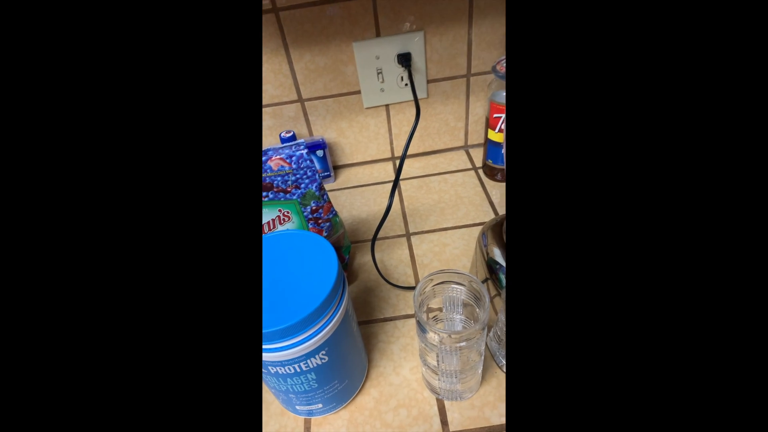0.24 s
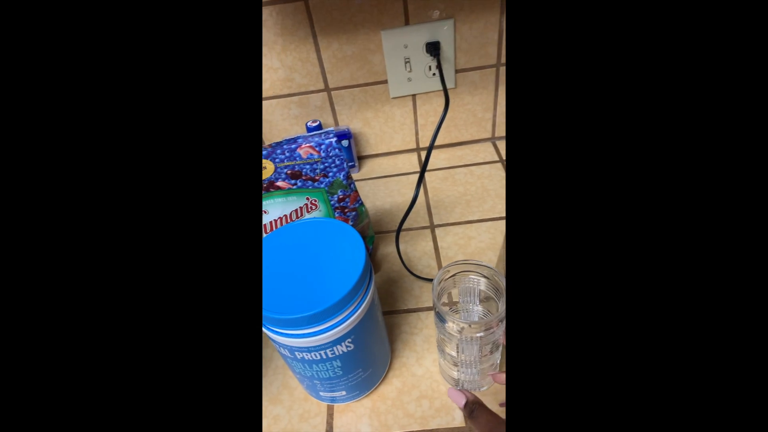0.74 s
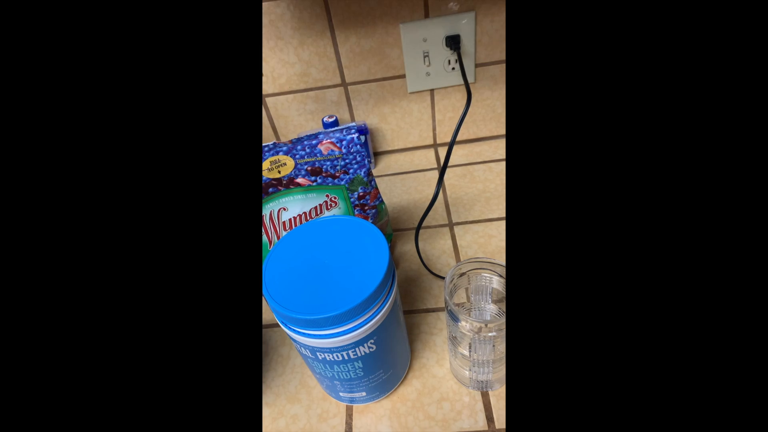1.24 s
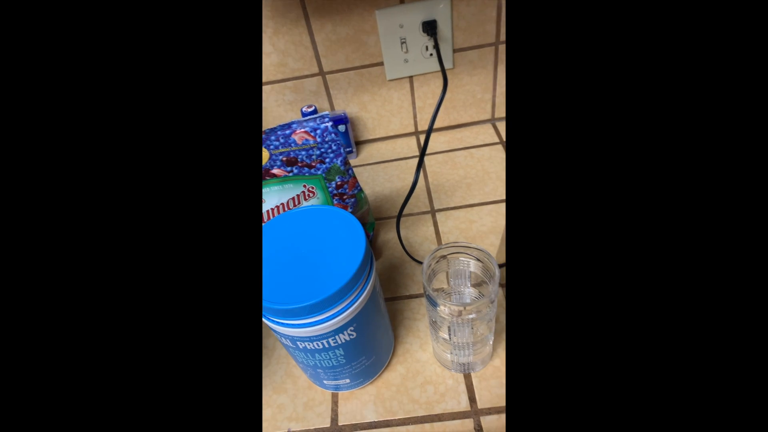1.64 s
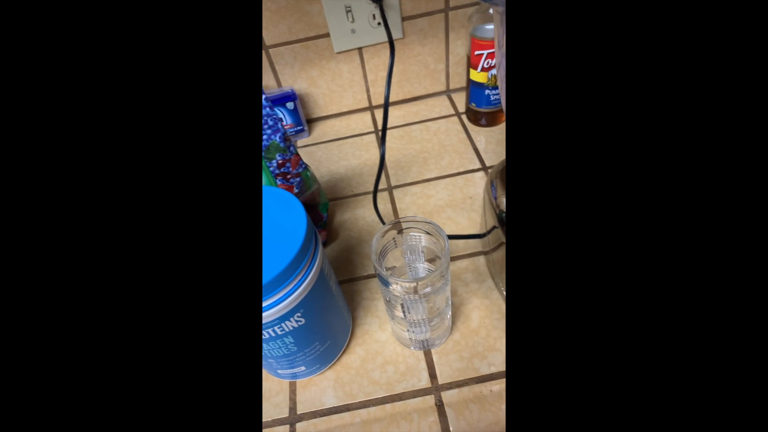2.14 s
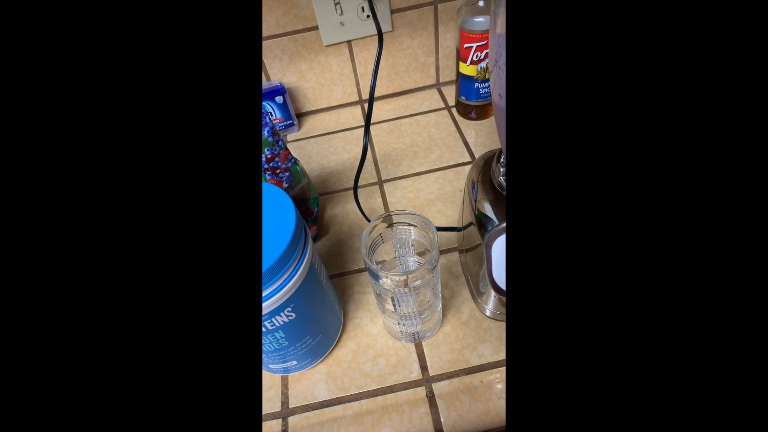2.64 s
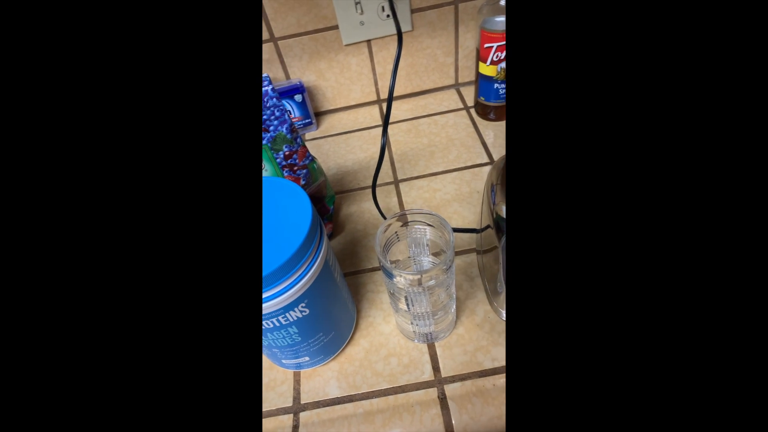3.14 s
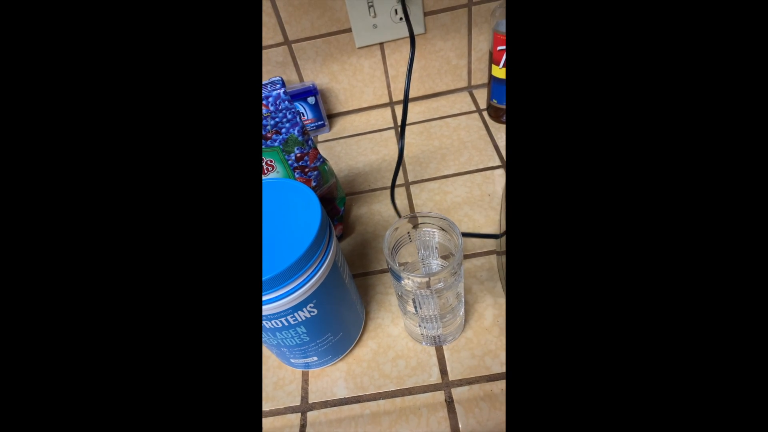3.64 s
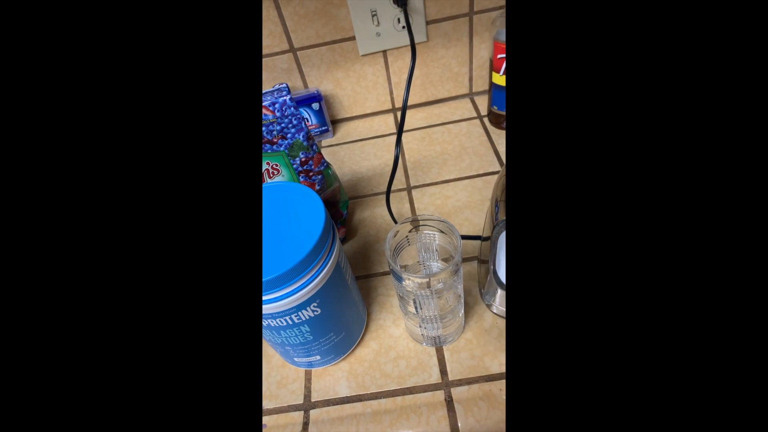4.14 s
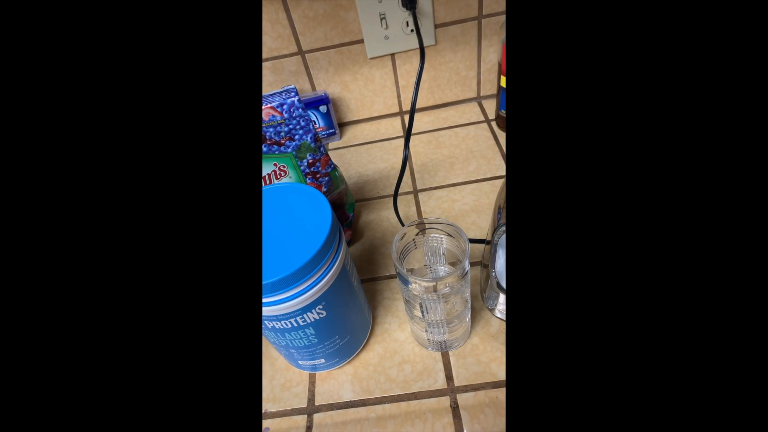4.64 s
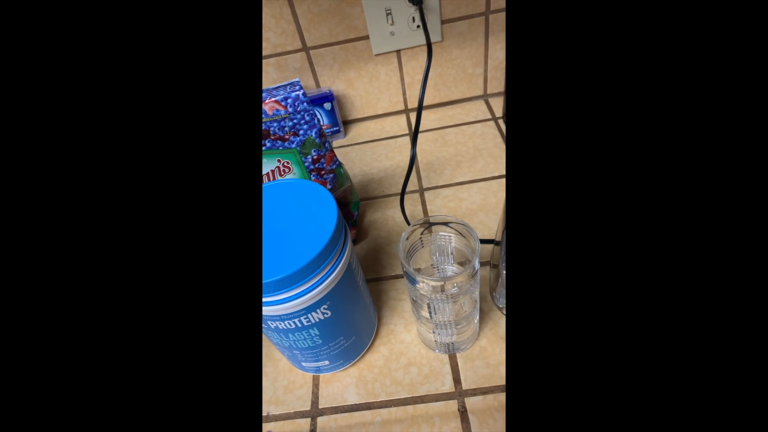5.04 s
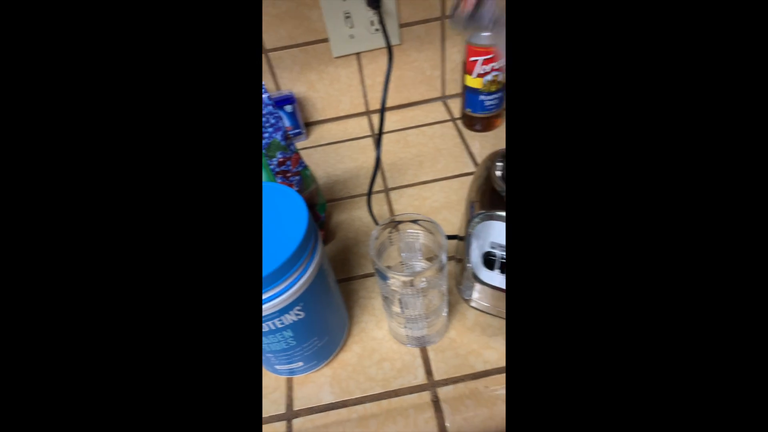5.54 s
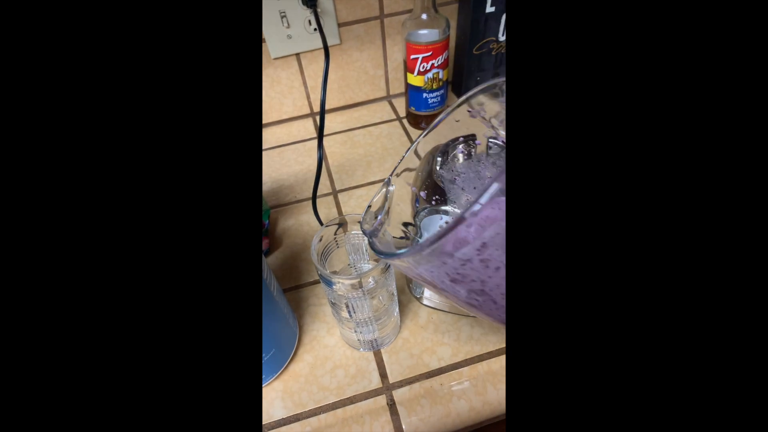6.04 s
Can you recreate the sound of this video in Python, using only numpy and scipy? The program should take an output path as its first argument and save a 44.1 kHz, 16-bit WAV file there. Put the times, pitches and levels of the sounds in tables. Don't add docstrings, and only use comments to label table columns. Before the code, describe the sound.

In a small, hard tiled kitchen, a drinking glass is dragged in a loud stuttering scrape, its rim clinking. A small hard object taps down, the glass slides briefly again, then a blender jug is twisted and rocked off its motor base with hollow knocks, sharp snaps and low thumps. Close handheld phone pickup, quiet room tone and faint low handling rumble.

```python
import sys
import numpy as np
from scipy import signal
from scipy.fft import rfft, irfft, next_fast_len
from scipy.io import wavfile
from scipy.ndimage import uniform_filter1d

SR = 44100
rng = np.random.default_rng(int(sys.argv[2]) if len(sys.argv) > 2 else 0)


def output_pcm(signal):
    pcm = np.clip(np.atleast_2d(signal).T, -1, 1) * 32767
    wavfile.write(sys.argv[1], SR, np.round(pcm).astype(np.int16))


def gain_from_decibels(decibels):
    exponent = np.asarray(decibels, float) / 20
    return 10 ** exponent


N = 277389

# frequency in Hz, level in dB.
HUSH_SPECTRUM = [(30, -7), (70, -2), (140, -6), (300, -6), (400, -9), (520, -21), (750, -15), (1100, -30),
                 (2000, -30), (2800, -35), (3600, -40), (5000, -44), (8000, -45), (16000, -49)]
# frequency in Hz, correlation from 0 to 1.
HUSH_LIKENESS = [(60, 1), (200, .9), (600, .8), (2000, .8), (3500, .65), (5000, .95), (8000, .6),
                 (12000, .9)]
# frequency in Hz, lead in rad.
HUSH_LEAD_RAD = [(0, 0), (600, 2.7), (1120, 3.5), (5170, 3.0), (6460, 5.2), (8870, 6.6), (11500, 9.2),
                 (13000, 9.8), (15700, 12.7), (16400, 19.4)]
# frequency in Hz, lead in rad.
GLASS_LEAD_RAD = [(0, 0), (780, -2.9), (1120, -0.8), (1810, 0.1), (2670, -2.8), (4220, -4.5), (6200, -1.0),
                  (9040, 0.2), (10900, 2.6), (13000, 3.4), (15100, 6.2), (16400, 6.6)]
# frequency in Hz, lead in rad.
JUG_LEAD_RAD = [(0, 0), (860, -3.4), (1810, -6.2), (2580, -9.2), (3960, -10.8), (5860, -8.7), (6630, -7.0),
                (8790, -6.1), (11300, -3.5), (12900, -2.9), (15200, -0.2), (16400, 0.2)]
# frequency in Hz, t60 in seconds.
ROOM_T60_S = [(100, 1), (300, 0.18), (800, 0.41), (2000, 0.28), (5000, 0.36), (12000, 0.311)]
# frequency in Hz, factor.
ECHO_APART_FACTOR = [(100, .15), (400, .6), (1200, 1.6), (2500, 1.5), (5000, .6), (9000, .25)]
# time in seconds, level in dB.
SQUEEZES = [(.16, -61.5), (.4, -65), (0.821, -68), (1.021, -72), (1.44, -68), (1.979, -63), (2.6, -66.5),
            (2.999, -62.5), (3.599, -62.5), (4.45, -71), (4.85, -70), (6.0, -71.5), (6.27, -63.5)]

# time in seconds, peak in dB.
TAPS = [
    (1.3905, -48.5),
    (1.3985, -40),
    (1.4025, -43.5),
    (1.4078, -51.5),
    (1.4175, -39),
    (1.4215, -46.5),
    (1.4275, -56),
]
# frequency in Hz, level in dB, t60 in seconds.
THING_MODES = [(1104, -3, 0.1), (1700, 0, 0.03), (1913, -9.5, 0.035), (2821, -3, 0.12), (3801, -8, 0.08),
               (4737, -7, 0.16), (5400, -11, 0.12), (6218, 0, 0.07), (6347, -4, 0.1), (8710, -6, 0.13),
               (10300, -14, 0.12)]

# start in seconds, hardest point in seconds, end in seconds,
# chatter in dB, low scrape in dB.
DRAGS = [(-0.05, 0.01, 0.085, -46, -58.5), (0.072, 0.082, 0.099, -38.5, -38), (0.1, 0.14, 0.32, -29, -52),
         (0.29, 0.312, 0.43, -32, -55.5), (0.42, 0.475, 0.51, -57, -42.5), (0.76, 0.83, 0.88, -59.5, -44),
         (0.875, 0.895, 0.922, -57, -48.5), (0.62, 0.72, 0.75, -66, -61), (0.93, 1.05, 1.145, -72, -71.5),
         (1.18, 1.3, 1.6, -70, -71), (1.78, 1.806, 1.98, -42.5, -49), (1.86, 1.946, 2.155, -44.5, -55)]
# peak in seconds, peak in
# dB, foot ring in Hz, wall ring relative to it in dB.
CATCHES = [(0.0818, -45, 1200, -10), (0.1156, -32, 1310, -13.5), (0.1199, -13, 1300, -3.5),
           (0.1286, -29.5, 1240, -10.5), (0.1362, -30.5, 1240, -1), (0.1406, -29, 1450, -5),
           (0.1526, -16, 1190, -7.5), (0.1612, -34.5, 1180, -10.5), (0.168, -32.5, 1240, -14.5),
           (0.175, -14.5, 1180, -5), (0.1838, -22.5, 1230, -18.5), (0.1911, -31.5, 1280, -6.5),
           (0.2002, -28, 1250, -3.5), (0.2072, -34.5, 1300, -11.5), (0.2136, -27, 1280, -17),
           (0.2237, -27.5, 1240, -16.5), (0.228, -21, 1220, -8), (0.2352, -28.5, 1200, -15),
           (0.2432, -31.5, 1270, -10), (0.2487, -25, 1450, -8.5), (0.2665, -40, 1310, -13),
           (0.2768, -37, 1290, -10), (0.285, -38.5, 1310, -9), (0.3024, -31.5, 1320, -11),
           (0.3071, -22.5, 1220, -2.5), (0.3198, -19, 1360, -6.5), (0.3273, -26.5, 1270, -9),
           (0.3314, -21.5, 1310, -14), (0.3404, -35.5, 1290, -5.5), (0.3501, -32, 1210, -14),
           (0.3597, -36, 1270, -14), (0.3651, -24, 1390, -11.5), (0.3778, -32, 1290, -23.5),
           (0.3853, -40, 1420, -11), (0.4046, -39, 1430, -6), (0.4156, -40.5, 1300, -5),
           (0.4327, -43.5, 1060, 0), (0.4385, -32.5, 1180, -7), (0.447, -37.5, 1160, -15),
           (0.4778, -34, 1260, -8.5),
           (1.788, -47.5, 1380, 8), (1.8005, -45.5, 1300, 8), (1.8066, -30.5, 1230, -8.5),
                  (1.8165, -35, 1225, -15.5), (1.8231, -32, 1240, -13), (1.8365, -35.5, 1226, -12),
                  (1.8735, -37, 1260, -15), (1.8825, -42.5, 1140, -10), (1.8957, -42, 1240, -22),
                  (1.9022, -24.5, 1172, -6.5), (1.9122, -39, 1170, -3), (1.9193, -26, 1180, -6),
                  (1.9234, -25, 1300, -15), (1.9299, -25.5, 1315, -18), (1.9362, -36, 1260, -5.5),
                  (1.9417, -29.5, 1300, -16.5), (1.9476, -20, 1390, -14), (1.9547, -33.5, 1177, -13),
                  (1.9607, -24.5, 1260, -4), (1.9683, -30, 1204, 4), (1.972, -35.5, 1250, -19),
                  (1.9753, -40.5, 1280, -7.5), (1.985, -43, 1300, -6), (1.9907, -37.5, 1415, -8),
                  (2.0013, -44.5, 1330, -10)]
# time in seconds, level in dB.
EDGE_TICKS = [(0.0783, -61), (0.1182, -38), (0.1501, -50.5), (0.1726, -49), (0.2262, -55), (0.2304, -51.5),
              (0.3063, -44.5), (0.318, -57), (0.3636, -65.5), (1.7878, -55.5), (1.8312, -56),
              (1.8696, -67.5), (1.902, -57.5), (1.9265, -55.5), (1.9579, -58)]
# time in seconds, ring in dB, clack in dB.
CLINKS = [(0.4185, -77, -74), (0.4294, -61, -54), (0.4339, -35.5, -46), (0.4605, -43.5, -51),
          (0.4665, -43, -52), (0.5024, -58, -50), (0.517, -54, -57), (0.5516, -68, -57), (0.8885, -91, -70),
          (0.9348, -85, -70), (0.9647, -69, -64)]
# start in seconds, hardest point in seconds, end in seconds,
# level in dB.
SHIVERS = [
    (0.6, 0.62, 1.02, -94),
    (0.79, 0.82, 0.85, -67),
    (0.93, 0.97, 0.95, -70),
    (1.19, 1.3, 1.32, -74.5),
]
# frequency in Hz, width in Hz, level in dB.
HOLLOW_MODES = [(225, 90, -23.5), (700, 150, -31), (880, 150, -14.5), (1180, 150, -8), (1300, 210, -1.5),
                (1420, 150, -7.5), (1710, 110, -9), (2235, 680, 1), (2377, 220, -13.5), (2650, 300, -16.5),
                (3240, 160, -17.5), (4020, 250, -13.5)]
# frequency in Hz, width in Hz, level in dB.
TILE_MODES = [(191, 82, -3.5), (272, 57, -8), (396.6, 25, -4.5), (586, 36, -9.5), (890, 44, -10)]
# frequency in Hz, level in dB, t60 in seconds.
RIM_MODES = [(4140, -24, .15), (5938, -5, .08), (6293, -8, .3), (6557, 0, .09), (7730, -24, .2),
             (9566, -8, .3), (9660, -15, .8), (10060, -12, .35), (11400, -20, .14), (13830, -16, .2),
             (13990, -13, .15), (15680, -13, .22)]
# frequency in Hz, level in dB.
CLACK_SPECTRUM = [(2500, -59), (4000, -4), (6500, -3.5), (9000, -9), (12000, 2.5), (14500, -4.5),
                  (16000, -12), (17500, -20)]
# frequency in Hz, level in dB.
CRACK_SPECTRUM = [(1500, -29), (3000, -9.5), (5000, -4.5), (6500, -4.5), (9000, -8.5), (12000, -8.5),
                  (14500, -12.5), (16500, -28.5)]

# start in seconds, hardest point in seconds, end in seconds, pressure in dB.
RUBS = [(1.625, 1.645, 2.9, -71.5), (2.47, 2.495, 2.56, -69.5), (2.53, 2.64, 2.84, -77.5),
        (2.87, 2.93, 2.98, -50.5), (2.9, 3.09, 3.21, -56), (3.29, 3.38, 4.7, -62.5),
        (3.45, 3.62, 3.05, -66), (3.92, 4.06, 4.6, -56), (4.13, 4.19, 4.3, -43.5), (4.54, 4.6, 4.96, -54.5),
        (4.62, 4.68, 4.52, -48), (4.8, 4.94, 3.7, -77), (4.99, 5.05, 4.96, -59), (4.3, 4.4, 4.52, -65),
        (4.7, 4.76, 3.33, -63.5), (5.08, 5.12, 5.3, -68.5), (3.12, 3.23, 3.34, -67.5)]
# time in seconds, strength in dB, hardness in dB.
TWISTS = [(1.6309, -71, -29), (2.4865, -60, -13), (2.873, -55, -1.5), (2.8996, -41.5, -13.5),
          (2.972, -46.5, -1.5), (3.0044, -35.5, 1.5), (3.095, -53.5, -1), (3.1035, -37, -14),
          (3.2032, -55, -4), (3.228, -50, -15), (3.301, -57.5, 0.5), (3.3117, -54.5, -1),
          (3.3366, -44.5, -12.5), (3.4, -48.5, -4.5), (3.4061, -51.5, 0.5), (3.419, -51, 3.5),
          (3.4413, -26.5, -4.5), (3.447, -34.5, -5.5), (3.6185, -55.5, -2), (3.6376, -51, -22),
          (3.658, -61.5, -0.5), (3.701, -67.5, -2.5)]
# time in seconds, strength in dB, hardness in dB.
LIFTS = [(3.8126, -47, -3), (3.8214, -34, -5), (3.8253, -23, 5.5), (3.8304, -26.5, -3.5),
         (3.8411, -37, -15), (3.945, -35, 6.5), (3.9554, -30, 4), (3.9776, -31.5, 4), (3.9834, -29.5, -6),
         (4.031, -32.5, -2), (4.0552, -36.5, 1), (4.141, -37, -12), (4.1523, -39.5, -23),
         (4.168, -41.5, -26), (4.185, -42, 8), (4.2067, -36.5, -26), (4.247, -37.5, -30),
         (4.2716, -43.5, -14), (4.286, -38, 1.5), (4.407, -59, -27), (4.544, -46.5, -3.5),
         (4.642, -42, 0.5), (4.6484, -44.5, -20), (4.576, -66, -11), (4.606, -64, -15), (4.6847, -59, 3),
         (4.699, -53.5, -10), (4.74, -65, 3), (4.873, -69, -13), (4.931, -71, -27.5), (4.995, -56.5, -11),
         (5.0188, -44.5, -18), (5.034, -51.5, -6), (5.052, -52, -11.5), (5.099, -67, -9)]
# time in seconds, level in dB.
SNAPS = [(3.0045, -27), (3.4411, -5.5), (3.8256, -16), (3.9553, -27), (3.9793, -34), (4.0311, -23),
         (4.0561, -31), (4.1394, -32.5), (4.1545, -36), (4.168, -40), (4.1868, -33), (4.2465, -45),
         (4.2716, -46.5), (4.2881, -29.5), (4.652, -30.5), (5.0195, -53), (5.0995, -52)]
# time in seconds, counter thump in dB, housing boom in dB.
THUMPS = [(1.6314, -68, -49.5), (2.4858, -53, -51.5), (2.9003, -46, -54), (3.0049, -41, -37.5),
          (3.1069, -44.5, -51), (3.2014, -58, -47.5), (3.441, -40, -52), (3.6147, -60, -57),
          (3.8201, -39.5, -31), (3.9448, -45, -32), (3.984, -47, -53), (4.0327, -53, -34),
          (4.0928, -50, -43), (4.1876, -42.5, -41), (4.2084, -54, -58.5), (4.2719, -53.5, -46),
          (4.4059, -69, -54), (4.5466, -70.5, -45), (4.6449, -47.5, -36), (4.6849, -46, -46),
          (4.951, -70, -51), (4.83, -65, -53), (5.0544, -56.5, -43), (5.1008, -66, -62.5)]
# time in seconds, peak in dB.
RATTLES = [
    (4.058, -44),
    (4.085, -68),
    (4.8598, -80),
    (4.9516, -92),
    (5.1, -67),
]
# frequency in Hz, width in Hz, level in dB.
SHELL_MODES = [(565, 62, -10), (931, 130, -5.5), (1240, 503, 8.5), (1390, 142, 0), (1723, 150, -3),
               (1900, 180, -12.5), (2481.7, 257, -1), (2845, 430, -9), (3460, 340, -5.5), (4100, 380, -12),
               (5025, 180, -10)]
# frequency in Hz, width in Hz, level in dB.
HOUSING_MODES = [(129, 68, -2), (185, 98, 1.5), (272, 74, -0.5), (397, 28, -0.5), (557, 40, -14.5),
                 (693, 77, 0.5)]
# frequency in Hz, width in Hz, level in dB.
COUNTER_MODES = [(61, 8.1, 6.5), (73.6, 53, 9.5), (126.8, 23, -0.5)]
# frequency in Hz, level in dB, t60 in seconds.
BLADE_MODES = [(4792, -21.5, 0.032), (5340, -1, 0.085), (8350, -14, 0.061), (11600, -35.5, 0.036)]

HUSH_DB, GRIP_DB, SQUEEZE_S = -65, -74.5, 0.13
BACK_WALL_S, BACK_WALL_DB = 0.0044, -12
EDGE_HZ = 16300
LEAN_IN = 0.7
DRAG_START_DB, DRAG_END_DB, SCRAPE_FOLLOWS = -0.5, -23.5, 0.9
SHIVER_START_DB, SHIVER_END_DB = -10, -10
RUB_START_DB, RUB_END_DB = -3, -20
CATCH_TICK_DB, CATCH_RISE_S = -32, 0.0018
FOOT_T60_S, WALL_T60_S, WALL_HZ, WALL_SPREAD = 0.02, 0.013, 2130, 0.05
HOUSING_SEATED_DB, HOUSING_LOOSE_DB = -13.5, -10.5
CONTACT_S, CONTACT_AT_DB, CONTACT_SHRINKS = 0.011, -39.5, 0.18
RUB_HISS_DB, RUB_HOUSING_DB, THUMP_HOUSING_DB = -20, -7, 2


def evened(x):
    return x / np.sqrt(np.mean(x ** 2) + 1e-20)


def read(points, hz):
    f, value = np.transpose(points)
    return np.interp(np.log(hz + 1), np.log(f + 1), value)


def by_width(modes, damping):
    return [(hz, damping * 2.2 / t60, db) for hz, db, t60 in modes]


def blows(rows, column, burst_s, rise_s=0):
    out, t = np.zeros(N + 2048), np.arange(1, 2049) / SR
    swell = 1 - np.exp(-(t / (np.reshape(rise_s, (-1, 1)) + 1e-6)) ** 2)
    decay = np.exp(-t / np.reshape(burst_s, (-1, 1)))
    bursts = rng.standard_normal((len(rows), 2048)) * swell * decay
    for row, burst in zip(rows, bursts):
        start = round(row[0] * SR)
        out[start:][:2048] += gain_from_decibels(row[column]) * burst / np.linalg.norm(burst)
    return out[:N]


def grit(per_s, spread_db):
    size_db = spread_db * np.minimum(rng.exponential(1, N), 4)
    size = gain_from_decibels(size_db) * rng.choice([-1., 1.], N)
    return evened(size * (rng.random(N) < per_s / SR))


def strokes(rows, column, start_db, end_db):
    out, t = np.zeros(N), np.arange(N) / SR
    for row in rows:
        lean = np.clip(LEAN_IN * (t - row[0]) / (row[1] - row[0]), 0, 1)
        course_db = np.interp(t, row[:3], [start_db, 0, end_db], left=-200, right=-200)
        out += lean * gain_from_decibels(row[column] + course_db)
    return uniform_filter1d(out, size=300)


def body(modes, hits=0, rub=0, build_cycles=0.36):
    t = np.arange(SR // 2) / SR
    ring = np.zeros(len(t))
    for k, (hz, width, db) in enumerate(modes):
        build = 1 - np.exp(-(hz * t / build_cycles) ** 2)
        decay = np.exp(-np.pi * width * t)
        ring += (-1) ** k * gain_from_decibels(db) * build * decay * np.sin(2 * np.pi * hz * t)
    drive = hits / abs(ring).max() + rub / np.linalg.norm(ring)
    return signal.fftconvolve(drive, ring)[:N]


def struck(rows, modes, burst_s, rise_s=0, uneven_db=4, detune=0.06, size=3072, firm=0, spiky=0):
    out, t = np.zeros(N + size), np.arange(1, size + 1) / SR
    hz, width, db = np.transpose(modes)[:, :, None]
    sign = (-1) ** np.arange(len(modes))[:, None]
    draws = rng.standard_normal((len(rows), 1024 + 2 * len(modes)))
    lasts = burst_s * np.ones(len(rows))
    rises = rise_s * np.ones(len(rows)) + 1e-6
    for row, draw, last, rise in zip(rows, draws, lasts, rises):
        share, shift = draw[1024:].reshape(2, -1, 1)
        rings = gain_from_decibels(db + uneven_db * share) * np.exp(-np.pi * width * t)
        rings *= np.sin(2 * np.pi * hz * (1 + detune * shift) * t)
        rings *= 1 - np.exp(-(hz * t / 0.67) ** 2)
        noise = draw[:1024]
        contact = firm + noise * abs(noise) ** spiky
        contact *= (1 - np.exp(-(t[:1024] / rise) ** 2)) * np.exp(-t[:1024] / last)
        sound = signal.fftconvolve((rings * sign).sum(0), contact)[:size]
        start = round((row[0] - .8 * rise) * SR)
        out[start:][:size] += gain_from_decibels(row[1]) * sound / abs(sound).max()
    return out[:N]


def coloured(x, spectrum):
    hz = np.linspace(0, SR / 2, 129)
    gain = gain_from_decibels(2 * read(spectrum, hz)) + 1e-6
    taps = signal.minimum_phase(signal.firwin2(255, hz, gain, fs=SR))
    return signal.oaconvolve(x, taps / np.linalg.norm(taps))[:N]


def hush():
    frames, hz = N // 256 + 5, np.fft.rfftfreq(1024, 1 / SR)
    a, b, c, d, patches = rng.standard_normal((frames, 513, 5)).T
    patches = evened(uniform_filter1d(uniform_filter1d(patches, size=8, axis=0), size=14, axis=1))
    drift = evened(uniform_filter1d(uniform_filter1d(a, size=120, axis=0), size=50, axis=1))
    same = np.clip(read(HUSH_LIKENESS, hz), 0, 1)[:, None]
    left = a + 1j * b
    right = same * left + np.sqrt(1 - same ** 2) * (c + 1j * d)
    z = np.array([left, right])
    z *= gain_from_decibels(read(HUSH_SPECTRUM, hz)[:, None] + 2.4 * patches + 1.5 * drift)
    tone = signal.istft(z, nperseg=1024, noverlap=768)[1][:, :N]
    return gain_from_decibels(HUSH_DB) * evened(tone)


def room(x, turns_per_s=2.3):
    size = 30000
    taps = np.zeros((9, size))
    at = np.arange(120, size, 20) + rng.integers(0, 20, (9, (size - 120) // 20))
    np.put_along_axis(taps, at, rng.choice([-1., 1.], at.shape), 1)
    hz, t, z = signal.stft(taps.reshape(3, 3, size), SR, nperseg=256)
    z = z[:, :1] + read(ECHO_APART_FACTOR, hz)[:, None] * z[:, 1:]
    decay = gain_from_decibels(-60 * t / read(ROOM_T60_S, hz)[:, None])
    tails = signal.istft(z * decay, SR, nperseg=256)[1]
    tails /= np.linalg.norm(tails[0, 0])
    turns = turns_per_s * np.arange(N) / SR + np.arange(3)[:, None] / 3
    feeds = np.sqrt(2 / 3) * np.cos(np.pi * turns)
    return signal.fftconvolve((x * feeds)[:, None], tails, axes=2).sum(0)[:, :N]


def ports(pair, lead_rad):
    size = next_fast_len(N)
    half = np.exp(.5j * np.interp(np.fft.rfftfreq(size, 1 / SR), *np.transpose(lead_rad)))
    return irfft(rfft(pair, size) * np.array([half, half.conj()]), size)[:, :N]


def grip():
    t = np.arange(N) / SR
    hold = gain_from_decibels(GRIP_DB) + sum(gain_from_decibels(db) * np.exp(-((t - s) / SQUEEZE_S) ** 2) for s, db in SQUEEZES)
    lumps = hold * grit(per_s=300, spread_db=2)
    return gain_from_decibels(1.0) * body([(40.26, 3.5, -4), (62.5, 7.4, 0.0)], rub=lumps)


def thing():
    rings = struck(TAPS, by_width(THING_MODES, 1.3), burst_s=0.00003, uneven_db=2.5, detune=0.0019,
                   size=8192, firm=3)
    clacks = gain_from_decibels(10.0) * blows(TAPS, column=1, burst_s=0.003, rise_s=0.0008)
    return gain_from_decibels(-7) * rings + coloured(clacks, CLACK_SPECTRUM)


def catch_rings(rows):
    out, t = np.zeros(N + 2048), np.arange(2048) / SR
    rise = np.sin(np.pi / 2 * np.minimum(t / CATCH_RISE_S, 1)) ** 2
    after = np.maximum(t - CATCH_RISE_S, 0)
    draws = rng.standard_normal((len(rows), 2))
    for (s, db, foot_hz, wall_db), (shift, turn) in zip(rows, draws):
        foot = gain_from_decibels(-60 * after / FOOT_T60_S) * np.sin(2 * np.pi * foot_hz * t)
        wall_hz = WALL_HZ * (1 + WALL_SPREAD * shift)
        wall = gain_from_decibels(wall_db - 60 * after / WALL_T60_S) * np.sin(2 * np.pi * wall_hz * t + turn)
        start = round((s - CATCH_RISE_S) * SR)
        out[start:][:2048] += gain_from_decibels(db) * rise * (foot + wall) / (1 + gain_from_decibels(wall_db))
    return out[:N]


def glass_foot():
    rows = CATCHES
    chatter = strokes(DRAGS, column=3, start_db=DRAG_START_DB, end_db=DRAG_END_DB)
    chatter = chatter * grit(per_s=1100, spread_db=2.0)
    catches = gain_from_decibels(-13.0) * struck(rows, HOLLOW_MODES, burst_s=0.00012, rise_s=0.0012, uneven_db=4.5,
                                  detune=0.07, firm=1.4)
    catches += gain_from_decibels(-0.5) * catch_rings(rows)
    hollow = body(HOLLOW_MODES, rub=gain_from_decibels(-9.5) * chatter)
    scrape = strokes(DRAGS, column=4, start_db=SCRAPE_FOLLOWS * DRAG_START_DB,
                     end_db=SCRAPE_FOLLOWS * DRAG_END_DB)
    scrape = body(TILE_MODES, rub=gain_from_decibels(-1.7) * scrape * grit(per_s=800, spread_db=1.5))
    ticks = gain_from_decibels(18.0) * blows(EDGE_TICKS, column=1, burst_s=0.0037)
    ticks += gain_from_decibels(CATCH_TICK_DB) * blows(rows, column=1, burst_s=0.004)
    ticks += gain_from_decibels(-44.5) * chatter
    clacks = gain_from_decibels(17.5) * blows(CLINKS, column=2, burst_s=0.0017)
    return catches + hollow + scrape + coloured(ticks, CRACK_SPECTRUM) + coloured(clacks, CLACK_SPECTRUM)


def glass_rim():
    clinks = struck(CLINKS, by_width(RIM_MODES, 1.2), burst_s=0.00003, uneven_db=3.5, detune=0.001,
                    size=16384, firm=3)
    shiver = strokes(SHIVERS, column=3, start_db=SHIVER_START_DB, end_db=SHIVER_END_DB)
    shiver = gain_from_decibels(-5.5) * shiver * grit(per_s=600, spread_db=2)
    return gain_from_decibels(3.0) * clinks + body(by_width(RIM_MODES[1:8], .8), rub=shiver)


def jug_knocks():
    slips = strokes(RUBS, column=3, start_db=RUB_START_DB, end_db=RUB_END_DB)
    slips = slips * grit(per_s=8000, spread_db=5.5)
    s, db, hard_db = np.transpose(TWISTS + LIFTS)
    housing_db = np.repeat([HOUSING_SEATED_DB, HOUSING_LOOSE_DB], [len(TWISTS), len(LIFTS)])
    knocks = np.transpose([s, db, db + hard_db, db + housing_db])
    contact_s = np.clip(CONTACT_S * gain_from_decibels(-CONTACT_SHRINKS * (db - CONTACT_AT_DB)), .001, .012)

    shell = gain_from_decibels(2.5) * struck(knocks, SHELL_MODES, contact_s, 0.59 * contact_s, uneven_db=4.5, spiky=2.37)
    shell += body(SHELL_MODES, rub=gain_from_decibels(-6.5) * slips)

    crack = gain_from_decibels(13.5) * blows(knocks, column=2, burst_s=0.6 * contact_s, rise_s=0.17 * contact_s)
    crack += gain_from_decibels(RUB_HISS_DB) * slips
    crack += blows(SNAPS, column=1, burst_s=0.0018)

    booms = gain_from_decibels(1.5) * blows(knocks, column=3, burst_s=0.006, rise_s=0.0042)
    booms += gain_from_decibels(THUMP_HOUSING_DB) * blows(THUMPS, column=2, burst_s=0.0075, rise_s=0.0052)
    housing = body(HOUSING_MODES, booms, gain_from_decibels(RUB_HOUSING_DB) * slips)

    blade = struck(RATTLES, by_width(BLADE_MODES, 2.4), burst_s=0.0022, uneven_db=10.0, detune=0.0018)
    return shell + coloured(crack, CRACK_SPECTRUM) + housing + gain_from_decibels(12.0) * blade


def jug_thump():
    pushes = gain_from_decibels(-6.5) * abs(blows(THUMPS, column=1, burst_s=.0001))
    return body(COUNTER_MODES, pushes, build_cycles=0.62)


def scene():
    foot = glass_foot()
    rings = glass_rim() + thing()
    echo = gain_from_decibels(BACK_WALL_DB) * np.roll(foot, round(BACK_WALL_S * SR)) * gain_from_decibels([[1.5], [-3.0]])
    glass_side = (foot + rings) * gain_from_decibels([[-.7], [.7]]) + echo
    glass_side = glass_side + room(gain_from_decibels(-5.5) * foot + gain_from_decibels(-11.0) * rings)
    knocks = jug_knocks()
    jug_side = knocks + gain_from_decibels(-10.0) * room(knocks) + jug_thump()
    placed = ports(glass_side, GLASS_LEAD_RAD) + ports(jug_side, JUG_LEAD_RAD)
    return ports(hush(), HUSH_LEAD_RAD) + grip() + placed


def roll_off(x):
    return signal.sosfilt(signal.butter(12, 16830, fs=SR, output="sos"), x)


def record(dry):
    lowpass = signal.firwin(511, EDGE_HZ, window=("kaiser", 9), fs=SR)
    limited = signal.oaconvolve(dry, lowpass[None], "same")
    return roll_off(limited)


dry = scene()
out = record(dry)
output_pcm(out)
```